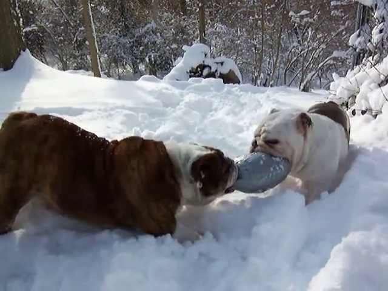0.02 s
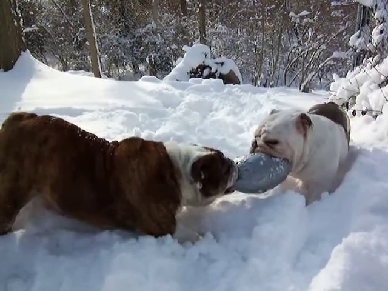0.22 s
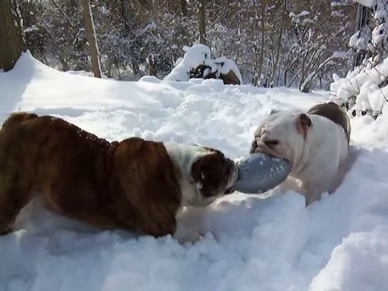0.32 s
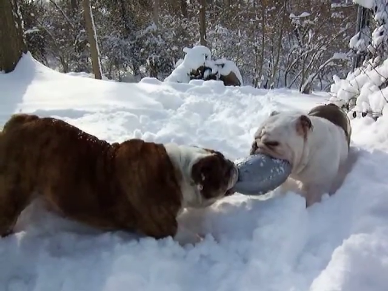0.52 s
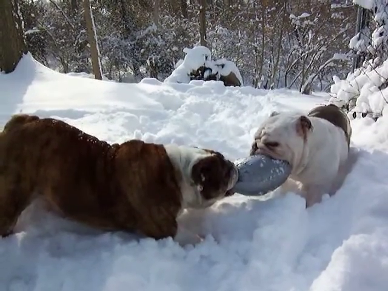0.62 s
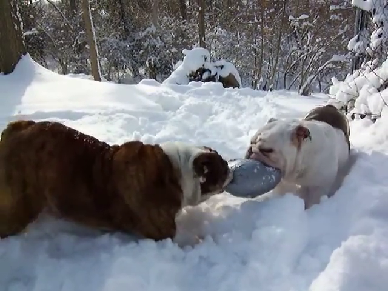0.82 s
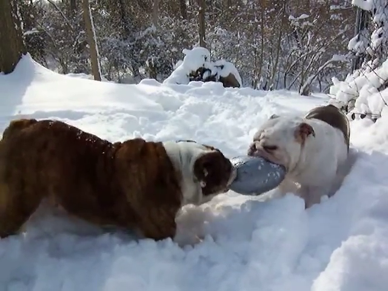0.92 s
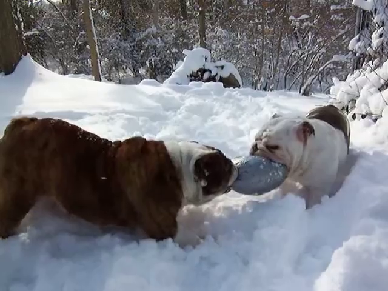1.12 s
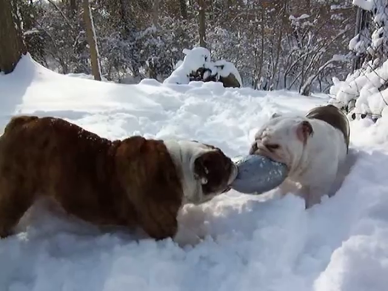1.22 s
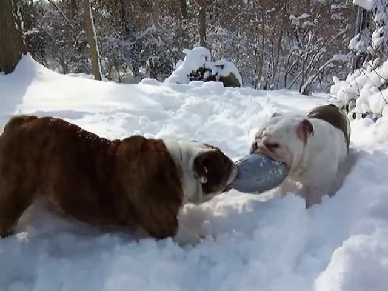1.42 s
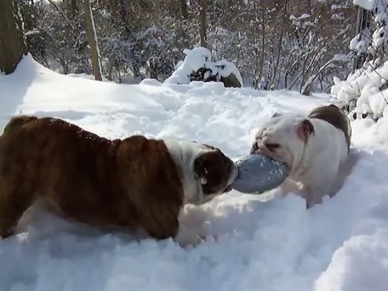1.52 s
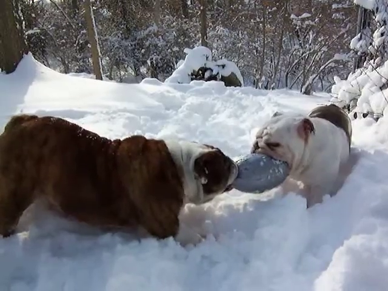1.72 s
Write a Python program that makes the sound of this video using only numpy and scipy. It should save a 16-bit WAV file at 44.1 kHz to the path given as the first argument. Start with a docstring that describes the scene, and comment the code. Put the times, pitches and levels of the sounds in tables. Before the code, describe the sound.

Rattling dog growl swells into a single sharp bark and sinks to a low grumble.

```python
"""Bulldogs tugging in the snow

Two bulldogs tug at a ball, close to a small microphone; the deep snow leaves no echo. A rattling growl
swells and breaks into one harsh, snapping bark, then sinks to a soft grumble. Paws thud, a dog snuffles
and the growl starts up again. Each voice is uneven throat pulses and rasping air ringing in resonances;
growl and grumble throb as the soft palate flaps."""
import sys
import numpy as np
from scipy import signal
from scipy.io import wavfile
from scipy.ndimage import uniform_filter1d

SR = 44100
rng = np.random.default_rng(int(sys.argv[2]) if len(sys.argv) > 2 else 0)


def digitize_waveform(pressure):
    """Quantize a signal to 16-bit integers and store it at the path in sys.argv[1].

    Rows of a 2-D input are taken as channels; values are limited to [-1, 1].
    """
    field = np.atleast_2d(pressure).T
    bounded = np.clip(field, -1, 1)
    quanta = np.round(bounded * 32767).astype(np.int16)
    wavfile.write(sys.argv[1], SR, quanta)


N = 79380
TIME = np.arange(N) / SR
GROWL_HZ = 113.58


def from_db(db):
    """Decibels to gain."""
    return 10 ** (np.asarray(db) / 20)


def rms_one(x):
    """Scale to rms 1."""
    return x / np.sqrt(np.mean(x ** 2) + 1e-20)


def evened(x):
    """Hold the level steady from one throat cycle to the next."""
    return x / np.sqrt(uniform_filter1d(x ** 2, size=600) + 1e-9)


def in_time(rows):
    """Each column after the first, which holds the seconds, as a curve in time."""
    seconds, *columns = np.transpose(rows)
    return [np.interp(TIME, seconds, column) for column in columns]


def during(rows, fade_s=0.035):
    """One while a table lasts, fading out on either side."""
    inside_s = np.minimum(TIME - rows[0][0], rows[-1][0] - TIME)
    return np.clip(1 + inside_s / fade_s, 0, 1)


def swell(at_s, spread_s):
    """A short bell-shaped rise and fall."""
    return np.exp(-.5 * ((TIME - at_s) / spread_s) ** 2)


def drift(rate_hz):
    """A random wander, gliding to a new value rate_hz times a second."""
    knots = rng.standard_normal(4096)
    return np.interp(TIME * rate_hz, np.arange(len(knots)), knots)


def resonance(x, hz, width_hz, db):
    """A steep resonance whose centre may move; its output has the given rms level."""
    carrier = np.exp(2j * np.pi * np.cumsum(hz * np.ones(N)) / SR)
    lowpass = signal.butter(2, np.clip(width_hz / 2, 5, SR / 4), fs=SR, output="sos")
    band = signal.sosfilt(lowpass, x / carrier + 1e-18) * carrier
    return from_db(db) * rms_one(band.real)


def tract(x, resonances):
    """Resonances in parallel."""
    return sum(resonance(x, *row) for row in resonances)


def folds(pitch_hz, jitter, shimmer_db, rasp, open_share, soft_hz, pulse_at_s=0):
    """Vocal folds slap shut unevenly, dull above soft_hz; each cycle lets out a puff of rasping air."""
    cycles = np.cumsum(pitch_hz * np.exp(jitter * drift(150))) / SR
    cycles -= np.interp(pulse_at_s, TIME, cycles)
    slaps = np.diff(np.floor(cycles), prepend=np.floor(cycles[0]))
    soften = signal.butter(1, soft_hz, fs=SR)
    slaps = signal.lfilter(*soften, rms_one(slaps - slaps.mean()))
    puffs = rng.standard_normal(N) * np.exp(-(cycles % 1) / open_share)
    strength = from_db(shimmer_db * drift(200))
    strength /= np.sqrt(uniform_filter1d(strength ** 2, size=1500))   # keep only the quick changes
    return (slaps + rasp * rms_one(puffs)) * strength


def throb(rate_hz, crest_at_s, depth_db, unevenness=.05):
    """The flapping palate opens and chokes the airway."""
    cycles = rate_hz * (TIME - crest_at_s) + unevenness * drift(40)
    return from_db(depth_db * np.cos(2 * np.pi * cycles))


def background():
    """The faint hiss of still outdoor air over a low rumble."""
    # Each row: centre in Hz, width in Hz, gain in dB.
    air_bands = [(150, 290, -63.5), (550, 920, -65), (1800, 3800, -70), (5360, 2500, -75)]
    rumble_bands = [(28.2, 90, -5.5), (62, 44, -7.5)]
    # Each row: time in seconds, gain of the rumble in dB.
    rumble_curve = [(0, -39), (0.45, -35), (0.82, -36), (0.92, -49), (1.3, -48.5), (1.42, -47.5),
                    (1.55, -48), (1.66, -50.5), (1.8, -55)]
    rumble_db, = in_time(rumble_curve)
    air = tract(rng.standard_normal(N), air_bands)
    return air + from_db(rumble_db) * tract(rng.standard_normal(N), rumble_bands)


def paws():
    """Dull thuds of weight pressed into snow."""
    # Each row: time in seconds, gain in dB.
    thuds = [(1.164, -48.5), (1.421, -41.5), (1.59, -47.5)]
    # Each row: centre in Hz, width in Hz, gain in dB.
    thud_bands = [(55, 24, 5.5), (116, 39, -8.5)]
    weight = sum(from_db(db) * swell(at_s, spread_s=0.0059) for at_s, db in thuds)
    return weight * tract(rng.standard_normal(N), thud_bands)


def snuffles():
    """Short, fluttering rushes of air through a dog's flat snout."""
    # Each row: time in seconds, spread in seconds, gain in dB.
    breaths = [(1.163, 0.0077, -56), (1.556, 0.032, -55.5)]
    # Each row: resonance in Hz, width in Hz, gain in dB.
    snout = [(543, 270, -4.5), (1160, 610, -5), (2210, 830, -4.5), (3660, 560, -3.5), (5060, 500, -5.5),
             (6440, 1500, -4.5)]
    flow = sum(from_db(db) * swell(at_s, spread_s) for at_s, spread_s, db in breaths)
    fluttering_air = rng.standard_normal(N) * from_db(4.4 * drift(200))
    return flow * tract(fluttering_air, snout)


def next_growl():
    """The airy beginning of the next growl, more rasp than pulse."""
    # Each row: time in seconds, gain in dB.
    onset = [(1.69, -75.5), (1.718, -61), (1.8, -60)]
    # Each row: resonance in Hz, width in Hz, gain in dB.
    mouth_bands = [(113, 66, 7.5), (614, 290, 2.5), (1050, 370, -3.5), (1860, 450, -6.5), (5170, 1460, -1),
                   (6450, 1500, -20.5)]
    gain_db, = in_time(onset)
    source = folds(GROWL_HZ, jitter=.2, shimmer_db=2, rasp=1.4, open_share=1.2, soft_hz=1000)
    return during(onset) * from_db(gain_db) * tract(source, mouth_bands)


def croaks():
    """Single flaps of the palate that stand out of the grumble."""
    # Each row: time in seconds, gain in dB.
    flaps = [(1.141, -45), (1.359, -47), (1.398, -51.5), (1.443, -68), (1.483, -49)]
    # Each row: resonance in Hz, width in Hz, gain in dB.
    mouth_bands = [(553, 150, -1.5), (900, 120, -9), (2130, 680, -27)]
    source = folds(pitch_hz=172.3, jitter=.1, shimmer_db=-2.5, rasp=.6, open_share=.9, soft_hz=1500)
    flow = sum(from_db(db) * swell(at_s, spread_s=0.0045) for at_s, db in flaps)
    return flow * tract(source, mouth_bands)


def grumble():
    """Jaws shut on the ball: soft throbs come apart as air runs out, the nose wheezing between them."""
    # Each row: time in seconds, mouth and chest gains in dB, first resonance in Hz, upper level in dB.
    contour = [(0.97, -38, -45.5, 644, -62), (1.025, -46, -56.5, 630, -60), (1.062, -44.5, -49.5, 570, -50),
               (1.11, -49, -50, 540, -63), (1.15, -48, -52, 580, -59), (1.28, -50.5, -50.5, 538, -62),
               (1.36, -50.5, -51.5, 603, -63.5), (1.44, -57.5, -53, 513, -67.5),
               (1.49, -56, -48, 580, -67.5)]
    # Each row: resonance in Hz, width in Hz, gain in dB.
    mouth_bands = [(913, 280, -4.5), (1356, 370, -13), (3720, 960, -15.5)]
    wheeze_bands = [(3670, 700, -70), (6230, 1750, -67)]
    mouth_db, chest_db, first_hz, upper_db = in_time(contour)
    source = folds(pitch_hz=172.3, jitter=.12, shimmer_db=1.5, rasp=0.83, open_share=1.1, soft_hz=1100)
    depth_db = np.interp(TIME, [1.3, 1.45], [2.9, 6.3])
    flaps = throb(rate_hz=23.13, crest_at_s=1.093, depth_db=depth_db)
    flapped = source * flaps * from_db(-depth_db / 2)
    mouth = tract(flapped, mouth_bands) + resonance(flapped, first_hz, width_hz=65, db=-4.5)
    upper = resonance(flapped, hz=2000, width_hz=480, db=upper_db)
    wheeze = tract(rng.standard_normal(N) / flaps, wheeze_bands)
    chest = resonance(source, hz=137, width_hz=122, db=chest_db)
    return during(contour) * (from_db(mouth_db) * mouth + upper + wheeze + chest)


def gurgles():
    """Wet bursts in the throat that stand out of the growl when a flap bursts open harder."""
    # Each row: time in seconds, gain in dB.
    bursts = [(0.075, -41), (0.165, -39), (0.253, -30), (0.291, -27), (0.366, -30), (0.373, -31.5),
              (0.429, -33.5), (0.528, -29), (0.562, -29), (0.66, -27.5), (0.697, -25.5)]
    # Each row: resonance in Hz, width in Hz, gain in dB.
    mouth_bands = [(130, 120, 0.5), (786, 237, -1), (1954, 240, -5.5), (3690, 1200, -19), (5450, 380, -20)]
    flow = sum(from_db(db) * swell(at_s, spread_s=0.002) for at_s, db in bursts)
    return flow * tract(rng.standard_normal(N), mouth_bands)


def growl():
    """A deep, rough growl; every flap of the palate also sets the nose ringing."""
    # Each row: time in seconds, then the gains of mouth, chest and nose in dB.
    contour = [(0, -40.5, -28, -57), (0.05, -42, -37.5, -61), (0.075, -40.5, -34, -49.5),
               (0.3, -38, -34, -48), (0.5, -37.5, -33.5, -47), (0.63, -36, -32.5, -50.5),
               (0.695, -33, -36.5, -43), (0.73, -33, -36, -48), (0.775, -29, -32.5, -45.5),
               (0.8, -28.5, -31.5, -51)]
    # Each row: resonance in Hz, width in Hz, gain in dB.
    mouth_bands = [(356, 250, -13), (540, 239, -1), (937, 243, -2.5), (1926, 260, -10.5), (2373, 305, -13),
                   (3765, 530, -16), (6660, 1660, -18)]
    flap_hz, crest_at_s = 22.36, 0.072
    mouth_db, chest_db, nose_db = in_time(contour)
    source = folds(GROWL_HZ, jitter=.2, shimmer_db=3.0, rasp=0.99, open_share=0.75, soft_hz=920)
    to_mouth = source * throb(flap_hz, crest_at_s, depth_db=1.0)
    to_nose = source * throb(flap_hz, crest_at_s, depth_db=4.5, unevenness=0.027)
    to_chest = source * throb(flap_hz, crest_at_s, depth_db=-1.5)   # swells as the other two dip
    mouth = from_db(mouth_db) * tract(to_mouth, mouth_bands)
    nose = resonance(to_nose, hz=5206, width_hz=330, db=nose_db)
    chest = resonance(to_chest, hz=134, width_hz=90, db=chest_db)
    return during(contour) * (mouth + nose + chest)


def bark():
    """Hard, separate slaps of the folds, with the quicker flutter of loose throat tissue between."""
    # Each row: time in seconds, then the gains of mouth, treble and bass in dB.
    contour = [(0.785, -60.5, -59.5, -45.5), (0.803, -27, -39.5, -20), (0.811, -25, -35.5, -24),
               (0.818, -14.5, -24, -24.5), (0.84, -16.5, -34.5, -32.5), (0.866, -18.5, -35, -31.5),
               (0.9, -22, -43, -78.5), (0.925, -27.5, -43, -50.5), (0.939, -25.5, -54.5, -67.5),
               (0.958, -46.5, -51.5, -49), (1.02, -57.5, -85, -55)]
    # The voice climbs. Each row: time in seconds, pulse rate in Hz, upper mouth resonance in Hz.
    glide = [(0.81, 83.9, 1710), (0.845, 86.65, 1727), (0.872, 92.1, 2200), (0.9, 139.3, 2150),
             (0.945, 148, 2000)]
    # Each row: resonance in Hz, width in Hz, gain in dB.
    mouth_bands = [(842, 302, -4.5), (1152, 137, -7), (1398, 350, -3), (2510, 140, -12.5)]
    treble_bands = [(3650, 650, 1), (4814, 760, -4.5), (5980, 1100, -3)]
    bass_bands = [(180, 61, -5), (471, 110, -4.5)]
    mouth_db, treble_db, bass_db = in_time(contour)
    pitch_hz, upper_hz = in_time(glide)
    slaps = folds(pitch_hz, jitter=.012, shimmer_db=1.2, rasp=0.4, open_share=1.2, soft_hz=5180,
                  pulse_at_s=0.8185)
    flutter = folds(pitch_hz=241.2, jitter=.3, shimmer_db=4, rasp=.6, open_share=0.37, soft_hz=5000)
    source = slaps + from_db(-2.5) * flutter
    upper = resonance(source, upper_hz, width_hz=383, db=0)
    mouth = from_db(mouth_db) * evened(tract(source, mouth_bands) + upper)
    hiss = from_db(treble_db) * tract(source + 1.9 * rng.standard_normal(N), treble_bands)
    bass = from_db(bass_db) * tract(source, bass_bands)
    return during(contour) * (mouth + hiss + bass)


def scene():
    """The dogs close by in the open air, in mono."""
    dogs = growl() + gurgles() + paws() + bark() + grumble() + croaks() + next_growl() + snuffles()
    return (dogs + background())[None]


def record(dry):
    """A small microphone whose treble rolls off, then ends steeply."""
    rolloff_hz, cutoff_hz = 7670, 8600
    dull = signal.sosfilt(signal.butter(8, rolloff_hz, fs=SR, output="sos"), dry)
    return signal.sosfilt(signal.ellip(10, .3, 80, cutoff_hz, fs=SR, output="sos"), dull)


dry = scene()
out = record(dry)
digitize_waveform(out)
```